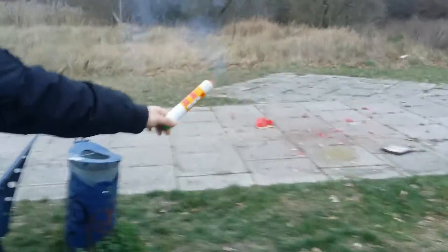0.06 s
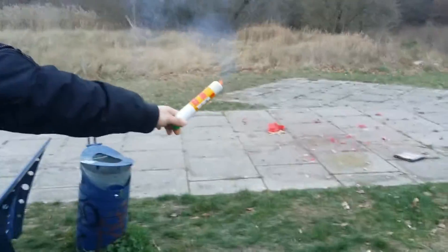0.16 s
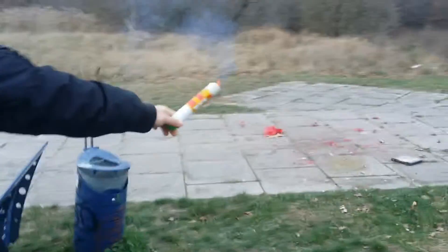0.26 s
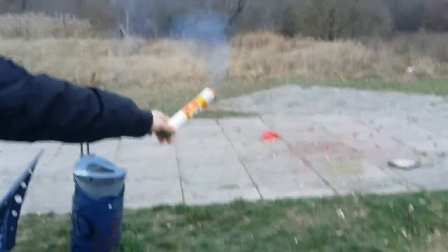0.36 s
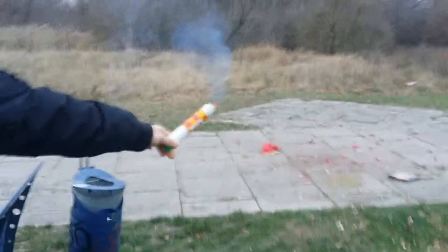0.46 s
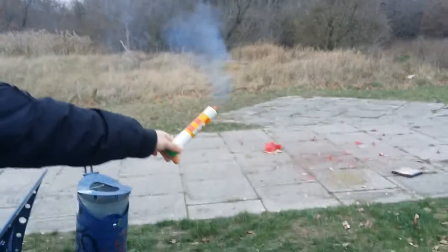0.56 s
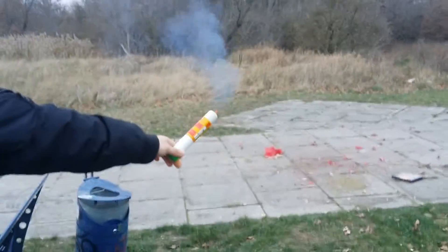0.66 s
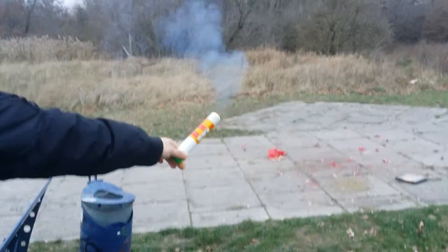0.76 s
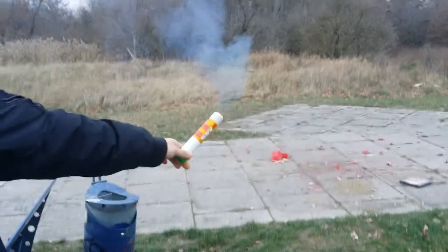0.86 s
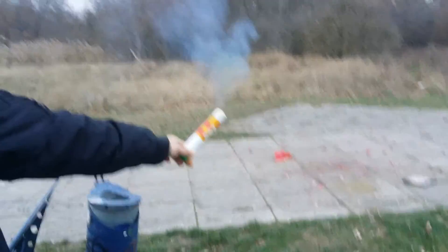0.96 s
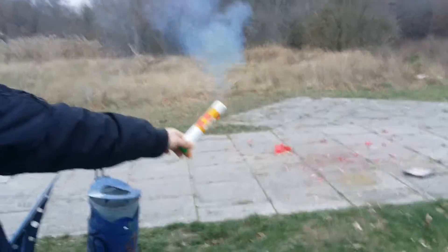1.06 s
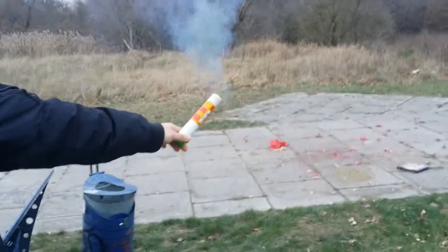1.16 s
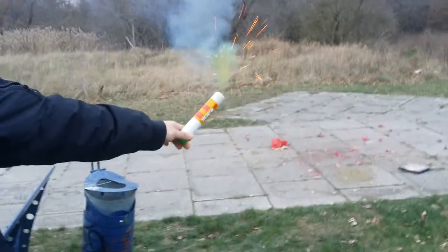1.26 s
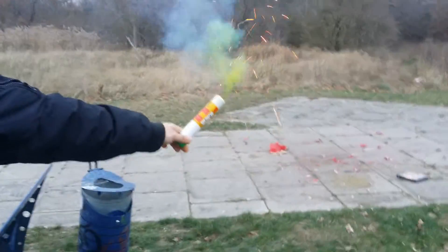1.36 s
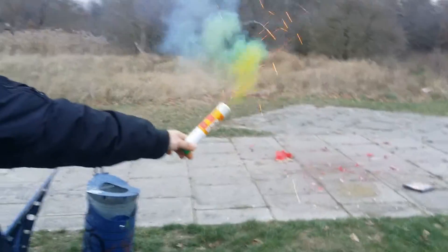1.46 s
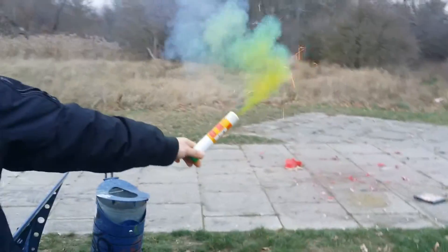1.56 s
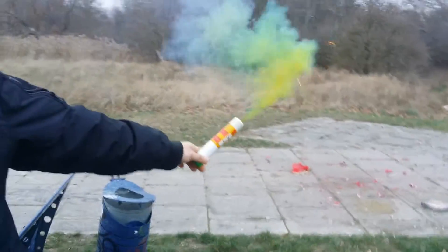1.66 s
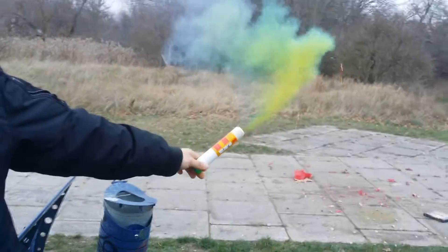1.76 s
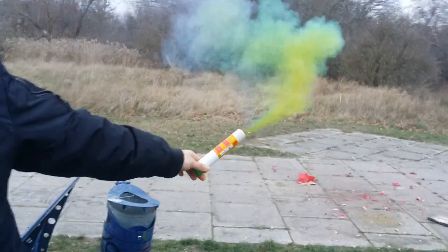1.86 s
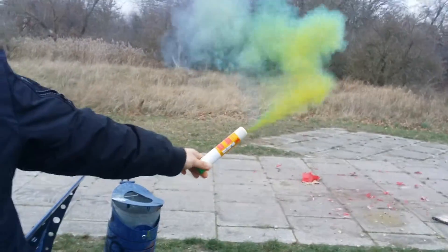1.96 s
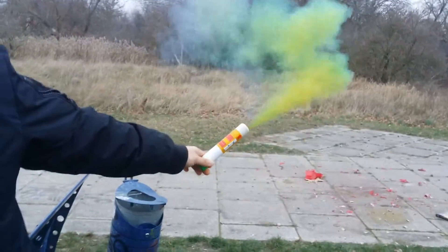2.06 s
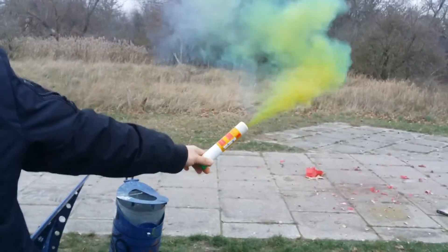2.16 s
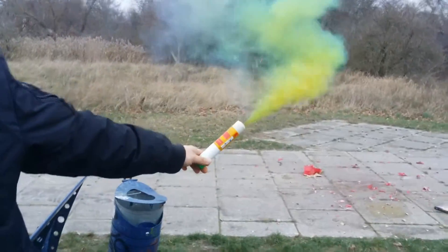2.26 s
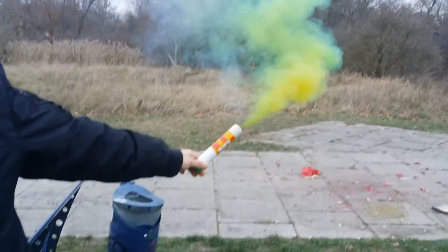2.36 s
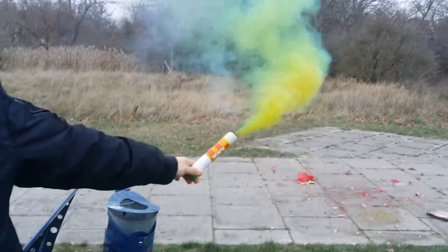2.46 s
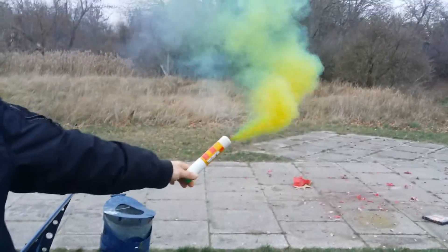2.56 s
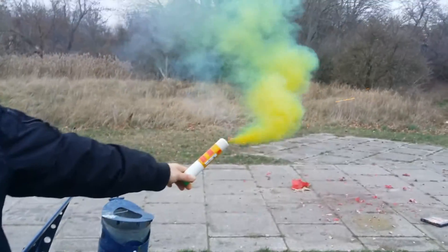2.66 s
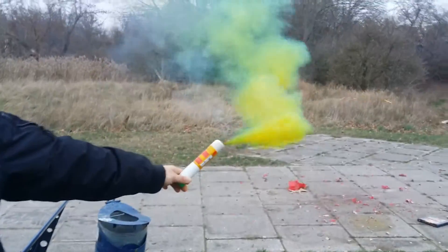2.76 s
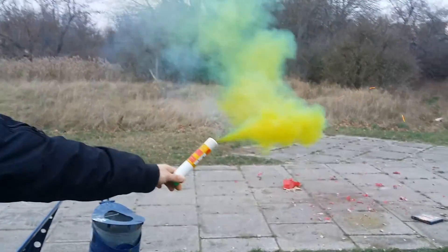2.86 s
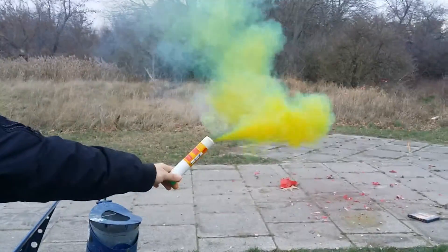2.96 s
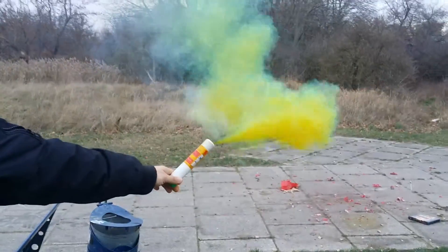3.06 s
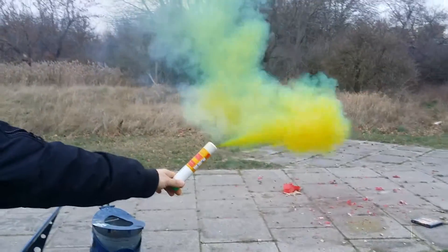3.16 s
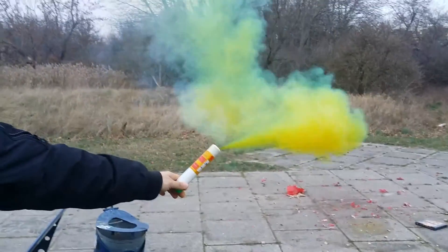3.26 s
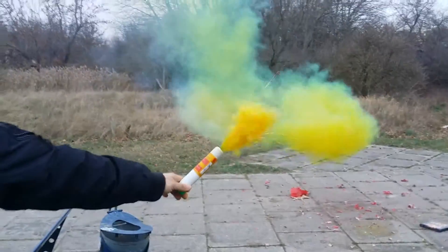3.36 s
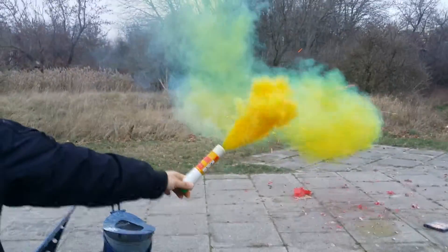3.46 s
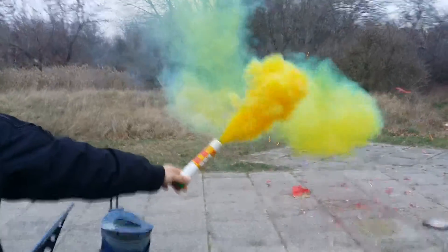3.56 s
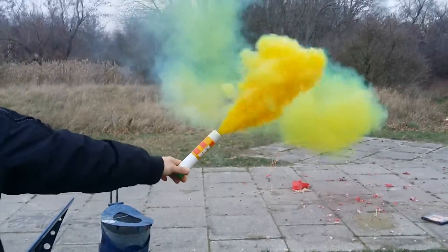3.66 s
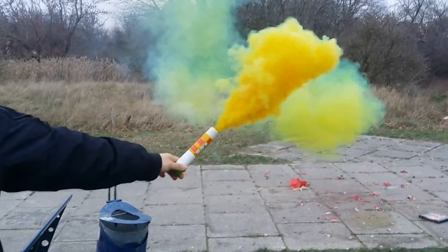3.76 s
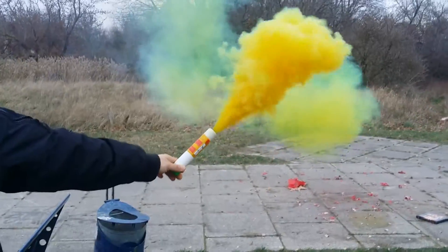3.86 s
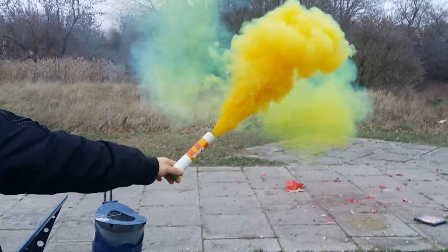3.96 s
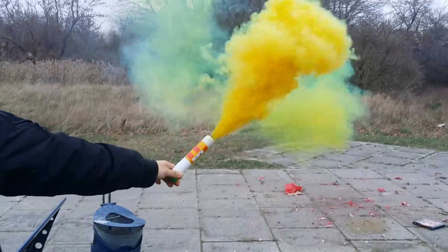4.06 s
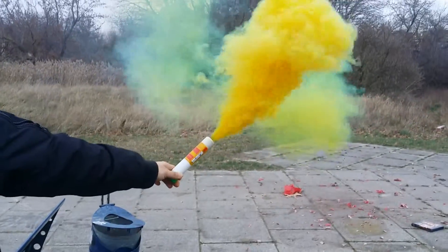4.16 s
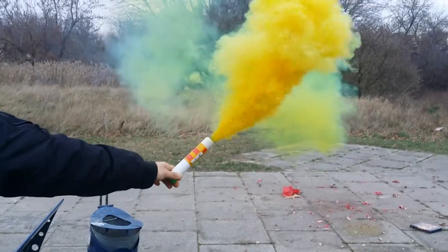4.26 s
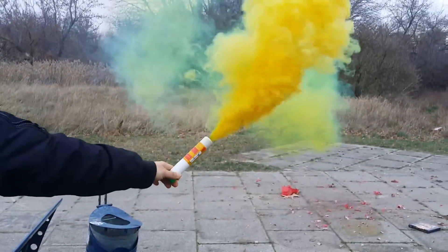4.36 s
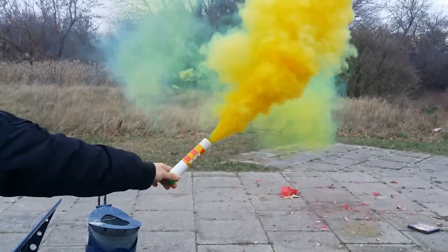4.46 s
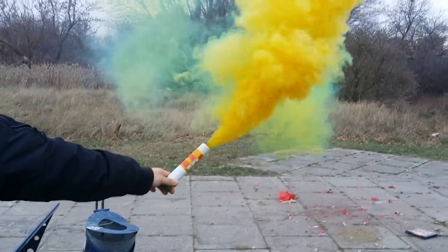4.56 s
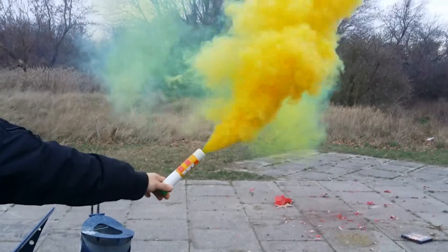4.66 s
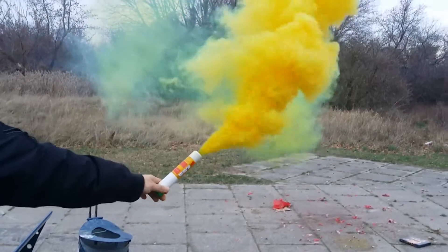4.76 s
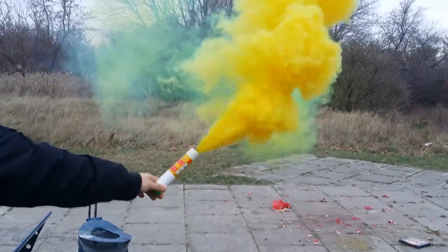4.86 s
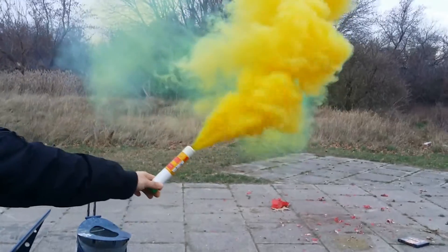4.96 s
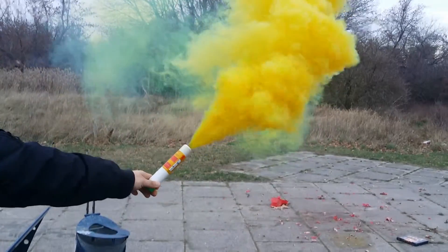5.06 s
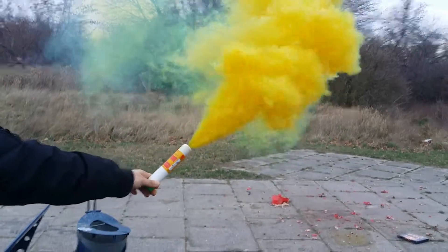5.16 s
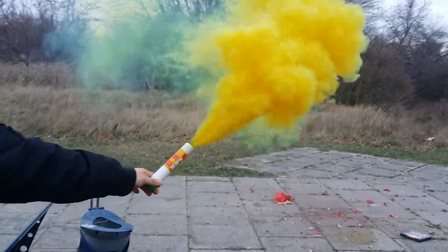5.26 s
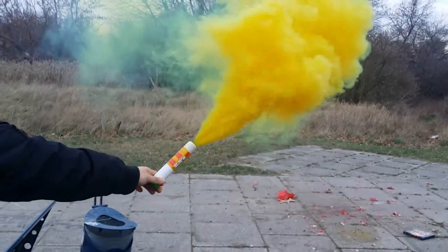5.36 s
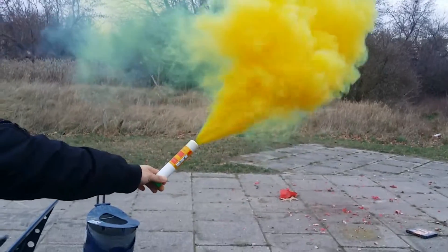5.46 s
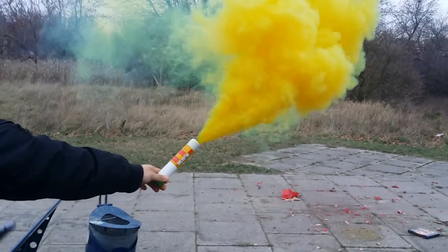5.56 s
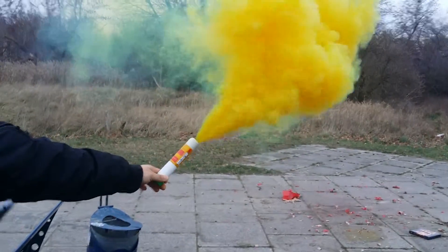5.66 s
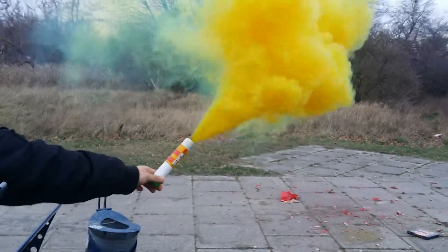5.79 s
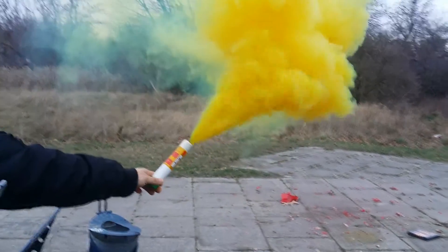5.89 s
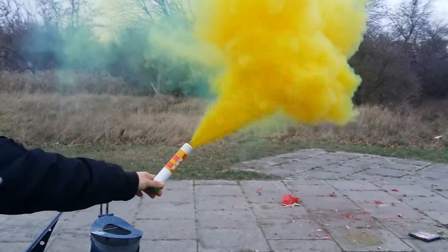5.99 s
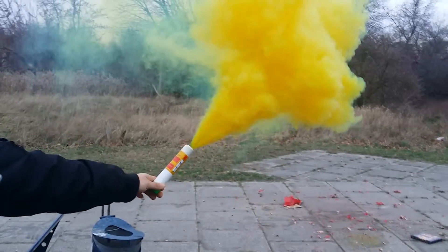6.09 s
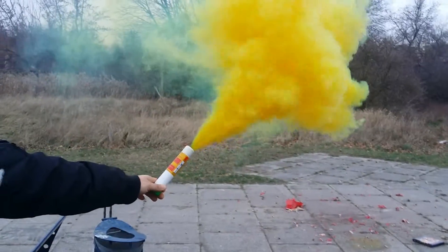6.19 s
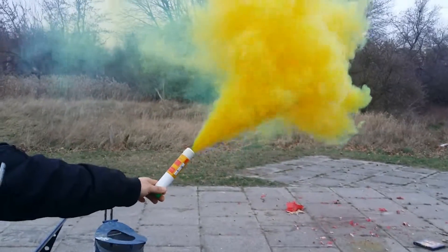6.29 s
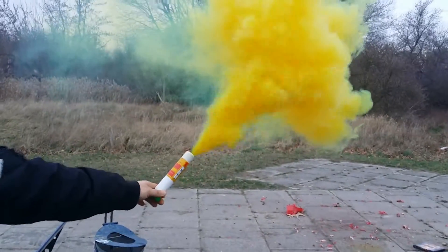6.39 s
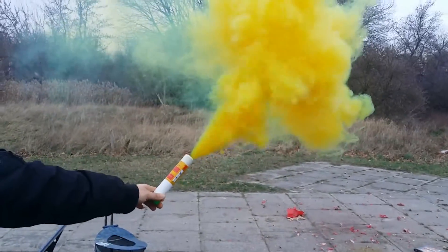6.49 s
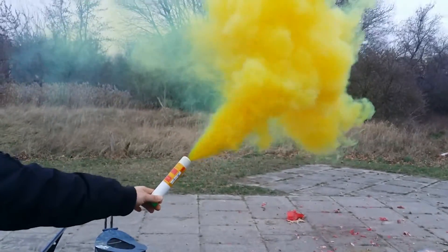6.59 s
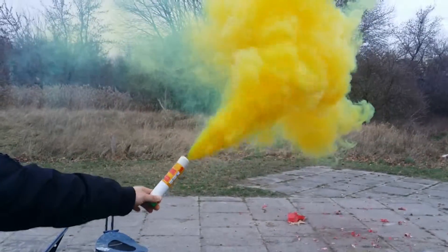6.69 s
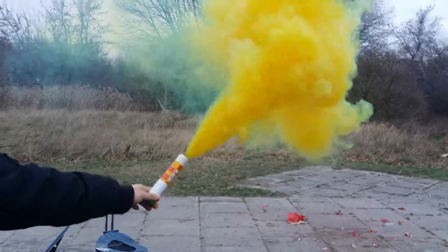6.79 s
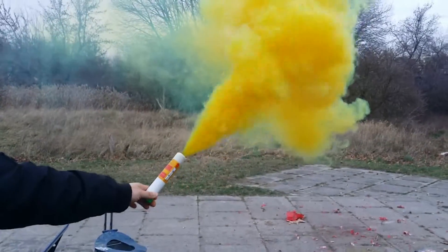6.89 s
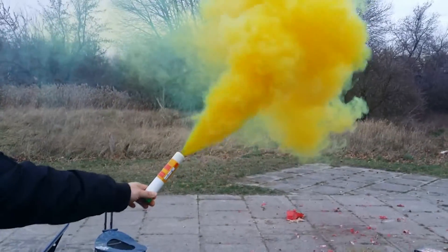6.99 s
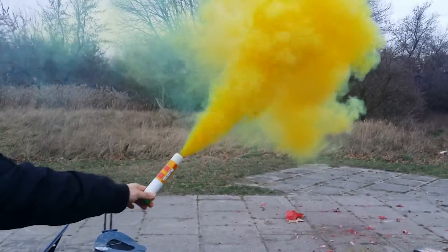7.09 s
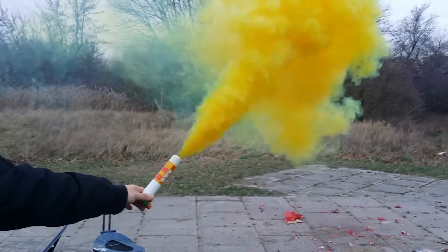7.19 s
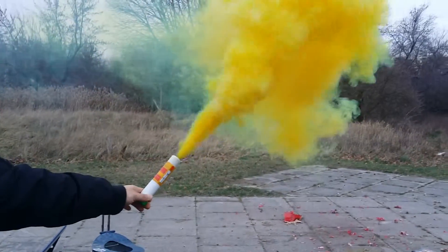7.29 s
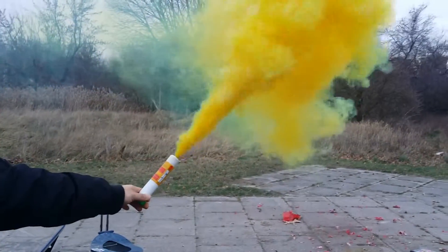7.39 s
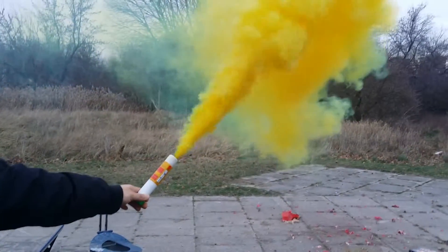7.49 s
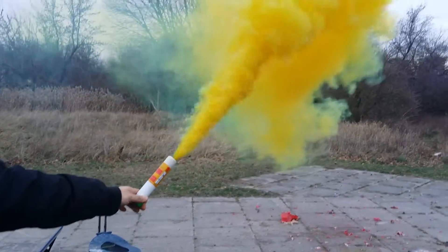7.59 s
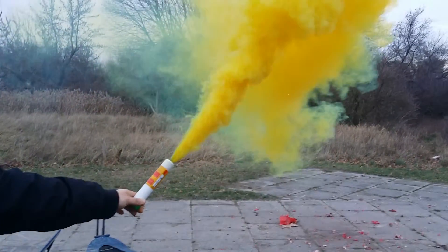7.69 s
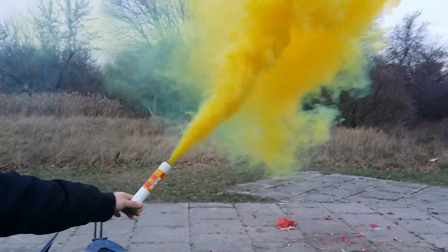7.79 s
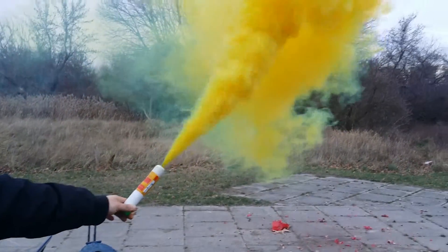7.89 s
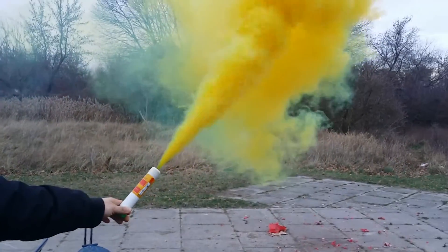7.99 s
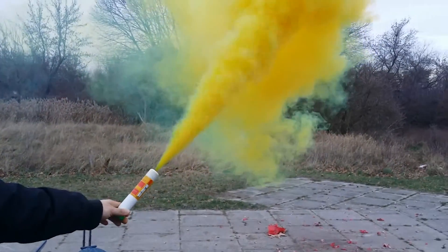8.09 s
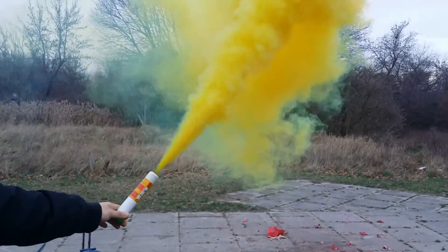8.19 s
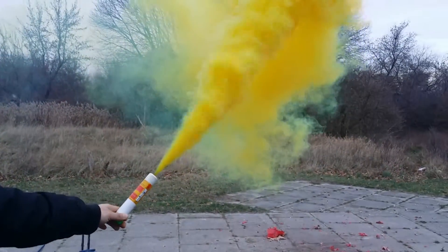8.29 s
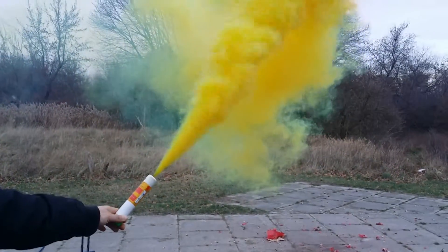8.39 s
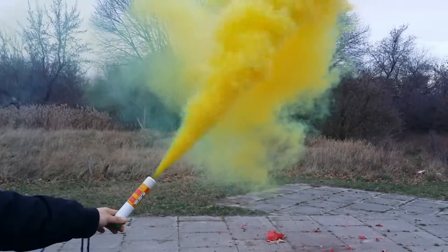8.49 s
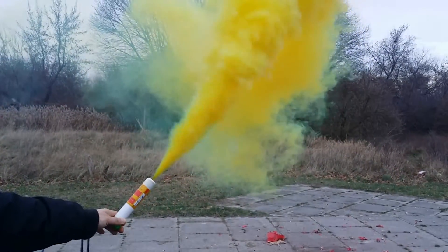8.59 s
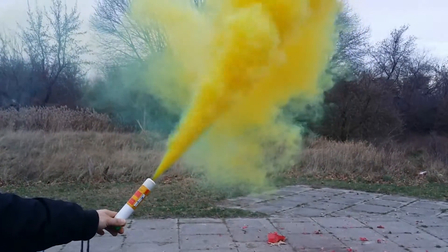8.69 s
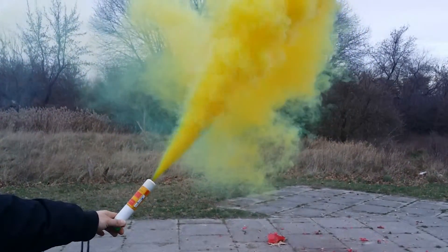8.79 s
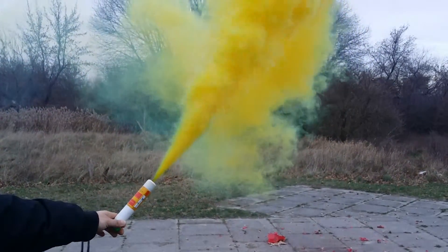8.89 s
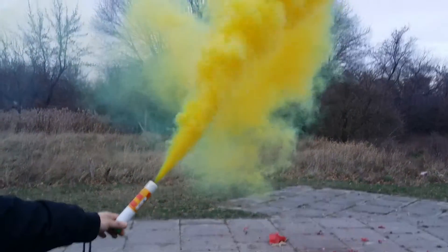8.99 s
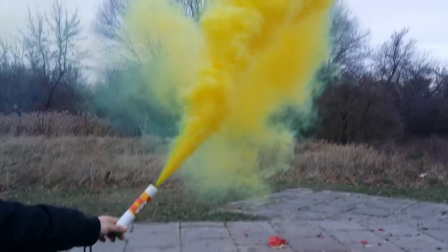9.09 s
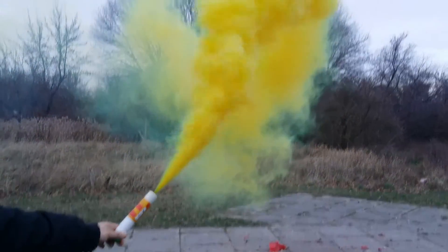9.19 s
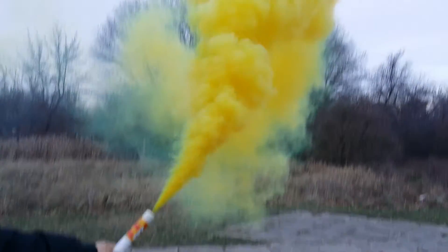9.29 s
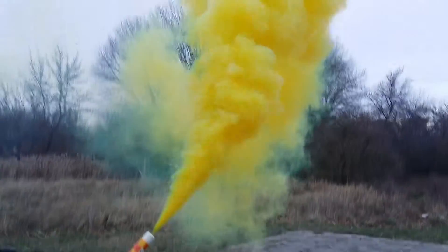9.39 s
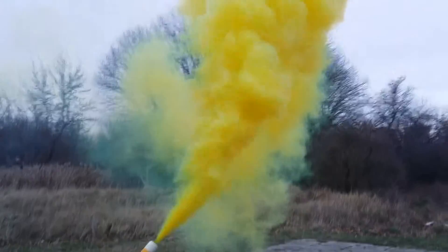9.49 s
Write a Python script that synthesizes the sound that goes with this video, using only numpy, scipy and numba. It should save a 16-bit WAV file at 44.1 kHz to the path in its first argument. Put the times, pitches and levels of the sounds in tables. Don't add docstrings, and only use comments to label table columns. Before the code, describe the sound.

Open air, small handheld stereo microphone about two metres from a burning smoke tube, with a short echo off stone slabs and a constant low rumble of far traffic. At 0.2-0.6 s light hollow knocks and a low shoe or sleeve scuff sound over a very faint hiss, with a small puff near 0.46. The hiss climbs quickly to about 1.6 s, then more gently, turning bright and steady; two soft knocks fall near 2.1-2.3. At 3.3 a pop and rub, then the jet dips and dulls before swelling again from 3.6. Small clicks and knocks come around 5. From 5.9 the loud hiss flutters and chuffs, with sharp spits and hollow tube pops strongest at 6.5-7.3, ending in a low thud and scuff. It stays loud and breathy, with more chuffs from 8.5 and a crisp spit at 9.45. Tone shifts subtly as the microphone moves.

```python
import sys
import numpy as np
from scipy import signal
from scipy.fft import rfft, irfft
from scipy.io import wavfile
from scipy.ndimage import uniform_filter1d, map_coordinates
from numba import njit

SR = 44100
rng = np.random.default_rng(int(sys.argv[2]) if len(sys.argv) > 2 else 0)


def persist_wave(psi):
    counts = np.round(np.clip(psi, -1, 1) * 32767).astype(np.int16)
    wavfile.write(sys.argv[1], SR, np.atleast_2d(counts).T)


def undo_db(level):
    steps = np.asarray(level, float) / 20
    return 10 ** steps


N = 420713
TIME = np.arange(N) / SR


def curves(table):
    s, *columns = np.transpose(table)
    return [np.interp(TIME, s, c) for c in columns]


def bumps(table, scale=1.):
    out = np.zeros(N)
    for s, db, build, drop in table:
        t = (TIME - s) / scale
        out += db * np.exp(-np.where(t < 0, t / build, t / drop) ** 2)
    return out


def walk(rate_hz):
    hold = int(SR / rate_hz)
    steps = np.repeat(rng.standard_normal(N // hold + 1), hold)
    return unit(uniform_filter1d(uniform_filter1d(steps, hold), hold)[:N])


def unit(x):
    return x / np.sqrt(np.mean(x ** 2))


def colour(x, table):
    hz, db = np.transpose(table)
    size = 4096
    log_hz = np.log(np.fft.rfftfreq(size, 1 / SR) + 1)
    cepstrum = irfft(np.log(undo_db(np.interp(log_hz, np.log(hz), db))))
    cepstrum[1:size // 2] *= 2
    cepstrum[size // 2 + 1:] = 0
    return signal.fftconvolve(x, irfft(np.exp(rfft(cepstrum))))[:N]


def dull(x, hz):
    return signal.lfilter(*signal.butter(1, hz, fs=SR), x)


def late(x, ms):
    return map_coordinates(x, [np.arange(N) - ms * SR / 1000], order=3)


@njit
def svf(x, hz, width_hz):
    y, b, l = np.empty(len(x)), 0., 0.
    for i in range(len(x)):
        g, k = np.tan(np.pi * hz[i] / SR), width_hz / hz[i]
        v = (b + g * (x[i] - l)) / (1 + g * (g + k))
        b, l, y[i] = 2 * v - b, l + 2 * g * v, k * v
    return y


def flare():
    # time in seconds, hiss level in dB, jet brightness in dB.
    flow_points = [(0, -66.5, -2), (.3, -57.5, -3), (.56, -52, -5), (.75, -46.5, -4.5), (1.1, -44.5, -1),
                   (1.19, -45, -2.5), (1.35, -39, -1), (1.6, -37.5, 1), (2.3, -35.5, 2.6), (3.31, -32, 3),
                   (3.35, -34.5, 0.5), (3.55, -39, -1.5), (4.3, -33, -0.9), (6.45, -27.5, 2), (7.2, -30, 3),
                   (7.55, -29.5, -0.3), (8.2, -27, 2.1), (9.54, -29.5, 2.5)]
    # crest in seconds, rise over the flow in dB, build in ms, drop in ms.
    chuff_events = [(.459, 6.5, 10, 8.9), (.933, 3, 32, 79), (2.93, -2.5, 23, 21), (3.412, 4.5, 45, 36),
                    (4.245, 1.5, 30, 30), (4.679, 1.5, 25, 18), (4.964, 2, 20, 20), (5.712, 2, 25, 25),
                    (5.941, 2.5, 18, 12), (6.071, 2, 18, 20), (6.38, 2.5, 25, 25), (6.475, 5, 19, 18),
                    (6.615, 5, 50, 44), (6.727, 7.5, 24, 11), (6.9, 6, 50, 33), (7.004, 6.5, 45, 34),
                    (7.225, 9.5, 54, 17), (7.338, 2.5, 18, 14), (7.757, 2.5, 56, 35), (7.842, 3.5, 30, 33),
                    (7.982, 2.5, 40, 38), (8.112, 2, 28, 21), (8.231, 1, 23, 20), (8.501, 5, 40, 33),
                    (8.635, 3.5, 30, 22), (8.755, 2.5, 24, 34), (8.885, 5, 26, 28), (9.069, 5, 32, 28),
                    (9.209, 3, 26, 24), (9.46, 5.5, 13, 32)]
    flow_db, tilt_db = curves(flow_points)
    chuff_db = bumps(chuff_events, scale=1 / 1000) + 0.78 * walk(15)
    return jet(undo_db(flow_db + chuff_db) + spits(), tilt_db) + roar(flow_db, chuff_db)


def spits():
    # start in seconds, peak in dB, length in ms.
    spit_events = [(0.4572, -21, 0.88), (3.3094, -24, 1.6), (5.9394, -12, 2.4), (6.4725, -16, 1.6),
                   (6.7266, -10, 1.8), (7.0034, -4, 1.6), (7.228, -4, 1.7), (8.4994, -19, 1.3),
                   (8.8994, -21, 1.6), (9.061, -17, 1.8), (9.4546, -5, 1.5)]
    out = np.zeros(N)
    for s, db, ms in spit_events:
        t = (TIME - s) * 1000 / ms - 1
        out += undo_db(db - 12) * np.exp(np.where(t < 0, 1.8 * t, -1.5 * t))
    return out


def jet(flow, tilt_db):
    # frequency in Hz, level in dB per Hz.
    jet_spectrum = [(150, -41.5), (600, -33), (1200.0, -23.5), (2200.0, -15.5), (3000.0, -7),
                    (4000.0, -7.5), (5000.0, -6.5), (5800.0, -3), (6500.0, 0.0), (7300.0, -4.5),
                    (8500.0, -7), (10000.0, -10.5), (12000.0, -14), (15500.0, -22.5)]
    patchy_db = .5 * walk(40) + 0.61 * walk(300)
    spark_on = rng.random(N) < 400 / SR
    spark_size = undo_db(3 + 2.7 * np.minimum(rng.exponential(size=N), 4.5))
    sparks = spark_on * rng.standard_normal(N) * spark_size
    gas = unit(rng.standard_normal(N) * undo_db(patchy_db) + sparks)
    hiss = colour(gas * flow, jet_spectrum) / np.std(colour(gas, jet_spectrum))
    low = dull(hiss, 5830.0)
    return undo_db(14) * (low * undo_db(-.8 * tilt_db) + (hiss - low) * undo_db(1.41 * tilt_db))


def roar(flow_db, chuff_db):
    # frequency in Hz, level in dB per Hz.
    roar_spectrum = [(150, -39), (300, -10.5), (500, -10), (800, -7), (1200, -2), (1800, -4), (2600, -3),
                     (4000, -32.5)]
    burn_down_db, burn_down_s = 8.5, 7.7
    level_db = -46.5 + 0.18 * (flow_db + 29) + 0.94 * chuff_db
    level_db = level_db + burn_down_db * np.minimum(TIME / burn_down_s, 1)
    noise = rng.standard_normal(N) * undo_db(walk(12))
    return unit(colour(noise, roar_spectrum)) * undo_db(level_db)


def knocks():
    # start in seconds, peak in dB, main mode in Hz, crack against ring in dB.
    knock_events = [(0.229, -28, 620, -20), (.25, -35, 500, -20), (0.284, -28, 600, -16),
                    (0.327, -33, 520, -26), (0.458, -28, 610, -24), (0.611, -34, 600, -18),
                    (2.118, -32, 373, -22), (2.255, -27.5, 420, -17), (3.313, -27, 1250, -9),
                    (4.866, -30, 740, -12), (4.951, -27, 1120, -10), (5.069, -28, 1110, -14),
                    (5.09, -29, 509, -12), (5.565, -27, 950, -7.5), (5.943, -28, 625, -17),
                    (6.369, -28.5, 686, -15), (6.471, -20, 1110, -21), (6.725, -18.5, 1076, -19),
                    (6.86, -37, 729, -9), (7.003, -22.5, 1090, -10), (7.226, -18, 745, -12),
                    (7.277, -29, 630, -7), (7.3, -18, 308, -17), (7.62, -30, 514, -21),
                    (7.723, -32.5, 540, -7), (9.057, -32, 500, -3), (9.454, -37, 715, -6)]
    out = np.zeros(N)
    t = TIME[:SR // 4]
    for s, db, hz, crack_db in knock_events:
        chance = rng.standard_normal(64)
        t60_s = np.clip(0.039 * undo_db(-.4 * (crack_db + 25.5)), .008, .12)
        fade = np.log(1000) * t / t60_s
        ring = np.exp(-(fade / 1.65) ** 2) * np.sin(2 * np.pi * hz * t)
        ring = ring + .5 * np.exp(-1.2 * fade) * np.sin(2 * np.pi * 1.43 * hz * t)
        ring = np.convolve(ring, np.hanning(64) * (1 + 2.2 * chance))[:len(t)]
        ring = ring / np.abs(ring).max()
        ring[:64] += undo_db(crack_db - 9) * np.hanning(64) * dull(chance, 2200.)
        ring[:30] -= undo_db(crack_db + 14.0) * np.hanning(30)
        i = int(s * SR)
        out[i:i + len(t)] += undo_db(db) * ring[:N - i]
    return out


def scuffs():
    # crest in seconds, level in dB, fade by 10 dB in seconds, centre in Hz.
    scuff_events = [
        (.245, -38, .2, 520),
        (.452, -42, .03, 600),
        (3.318, -37, 0.16, 1400),
        (7.31, -31.5, 0.17, 330),
    ]
    rise_s = 0.013
    grit = unit(rng.standard_normal(N) * undo_db(2.3 * walk(70)))
    out = np.zeros(N)
    for s, db, fade_s, hz in scuff_events:
        t, centre_hz = TIME - s, np.full(N, 1. * hz)
        fall_db = np.where(t < 0, t / rise_s, -t / fade_s) * 10
        fall_db = fall_db - 60 * np.maximum(t / fade_s - 1.3, 0)
        band = svf(svf(grit, centre_hz, .8 * hz), centre_hz, 1.1 * hz)
        out += undo_db(db - 3.0 + fall_db) * unit(band)
    return out


def slab_echo(near):
    # time in seconds, echo delay in ms, level in dB.
    slab_path = [(0, 5.1, -12.5), (4, 5.5, -12), (6.5, 5.6, -11), (9.54, 5.54, -12)]
    echo_ms, echo_db = curves(slab_path)
    return undo_db(echo_db) * late(dull(near, 2330.0) + undo_db(-9) * near, echo_ms)


def bin_glance(near):
    return undo_db(-15) * late(near, 1.6 + 0.052 * walk(1.55))


def clutter(near):
    t60_s = 0.044
    tail = rng.standard_normal(SR // 6) * np.exp(-np.log(1000) * TIME[:SR // 6] / t60_s)
    tail = tail / np.sqrt(np.sum(tail ** 2))
    return late(signal.fftconvolve(near, tail)[:N], 1.505 + 0.201 * walk(2))


def slot(x, hz, keep):
    return x - (1 - keep) * svf(x, hz, 417.0)


def shell(x, pose, port):
    # centre in Hz, width in Hz, remainder as a ratio
    valley_rows = [(3080, 3440, 0.19), (5840, 2200, 0.66), (8190, 6300, 0.2), (10640, 5200, 0.22),
                   (14130, 3600, 0.43), (2523, 4520, 0.18), (5684, 5740, 0.074), (9570, 5100, 0.15),
                   (13050, 5440, 0.14)]
    slide_rows = [(-0.14, 0.11, 0.066), (-0.3, -0.21, 0.043), (0.023, -0.018, -0.075),
                  (-0.18, -0.0048, 0.024), (-0.201, -0.016, 0.14), (-0.036, -0.063, -0.054),
                  (-0.0012, -0.034, -0.032), (0.0078, -0.051, -0.031), (0.04, -0.027, -0.0078)]
    depth_rows = [(0.094, -0.068, -0.18), (-0.27, 0.57, 0.11), (0.18, -0.13, 0.14), (0.5, 0.2, -0.38),
                  (-0.59, 0.93, 0.02), (0.0053, -0.065, 0.0081), (0.034, -0.056, -0.01),
                  (0.063, 0.13, -0.094), (0.25, 0.28, 0.18)]
    own = slice(0, 5) if port == "left" else slice(5, None)
    for (hz, width_hz, keep), slide, depth in zip(valley_rows[own], slide_rows[own], depth_rows[own]):
        centre_hz = np.minimum(hz * 2 ** (np.array(slide) @ pose), .4 * SR)
        remainder = np.minimum(keep + np.array(depth) @ pose, 1)
        x = x - (1 - remainder) * svf(x, centre_hz, 1. * width_hz)
    return x


def camera(near, blows):
    # time in seconds, turn as left lag in ms, tip -1..1, roll -1..1.
    aim_points = [(0.32, -0.028, 1.0, 0.39), (0.57, -0.027, 0.67, 0.74), (0.88, -0.023, 0.68, 1),
                  (1.18, -0.021, 0.23, -0.6), (1.55, -0.011, 0.081, -0.76), (2.15, -0.0063, 0.075, -1.2),
                  (2.9, -0.025, -0.29, -0.75), (3.65, -0.023, -0.67, 0.13), (4.35, -0.026, -0.61, 0.14),
                  (5.0, -0.037, -0.78, 0.41), (5.65, -0.042, -0.79, 0.26), (6.35, -0.043, -0.61, 0.41),
                  (6.98, -0.051, -0.015, 0.14), (7.58, -0.067, 0.33, -0.39), (8.3, -0.072, 0.12, -0.18),
                  (9.1, -0.071, 0.31, -0.2)]
    # time in seconds, both ports Hz, remainder ratio, left port Hz, remainder ratio.
    slot_points = [(0, 2850, .6, 3900, .3), (.5, 2700, .35, 3300, .1), (1.0, 2750, .35, 3400, .15),
                   (1.2, 2150, .3, 1950, .1), (1.6, 2200, .3, 2300, 0.073), (3.2, 2490, .15, 2820, .05),
                   (5, 2580, .2, 3240, 0.045), (6.6, 2560, 0.36, 3300, 0), (9.54, 2620, 0.79, 3360, 0.023)]
    # dB per unit of turn, of tip, of roll.
    left_moves_db = [0.5, -.6, 1.35]
    lag_ms, tip, roll = curves(aim_points)
    ahead_ms, turn_ms = -.04, .04
    pose = np.array([(lag_ms - ahead_ms) / turn_ms, tip, roll])
    both_hz, both_keep, left_hz, left_keep = curves(slot_points)
    left_db = -5 + np.array(left_moves_db) @ pose
    arriving = near + slab_echo(near) + blows + bin_glance(near)
    ports = []
    for port, delay_ms, db in (("left", lag_ms, left_db), ("right", 0 * lag_ms, 0)):
        scatter = clutter(near)
        heard = late(arriving, delay_ms) + undo_db(-17.0) * scatter
        shaded = shell(slot(heard, both_hz, both_keep), pose, port)
        ports.append(undo_db(db) * shaded + undo_db(-11) * dull(scatter, 660.0))
    return np.array([slot(ports[0], left_hz, left_keep), ports[1]])


def town():
    # frequency in Hz, level in dB per Hz.
    town_spectrum = [(15, -38), (30, -16.5), (55, -2.5), (90, 1), (125, 2), (180, -1), (260, -9.5),
                     (500, -14.5), (1200, -20), (2500, -29.5), (6000, -38), (15000, -36)]
    # crest in seconds, swell in dB, approach in seconds, leave in seconds.
    passer_events = [
        (.25, -3.5, 0.18, .12),
        (.6, 1.5, 0.21, 0.23),
        (1.4, 1.5, 0.18, 0.69),
        (3.9, 6, 0.11, .15),
        (4.5, 0.5, .4, .4),
        (5.05, 5, 0.29, 0.3),
        (6.6, 4, 0.62, 0.43),
        (7.36, 4, 0.18, 0.16),
        (8.2, 3.5, 0.68, 0.27),
    ]
    mid = unit(colour(rng.standard_normal(N), town_spectrum))
    side = unit(colour(rng.standard_normal(N), town_spectrum))
    air = side - uniform_filter1d(side, 60)
    side = side * undo_db(-18) + undo_db(-2.5) * air
    swell = undo_db(-48 + bumps(passer_events) + 1.46 * walk(5))
    return swell * np.array([undo_db(-0.5) * (mid + side), undo_db(1.86) * (mid - side)])


def scene():
    return camera(flare() + scuffs(), knocks()) + town()


def low_pass(x):
    return signal.sosfilt(signal.butter(12, 15660, fs=SR, output="sos"), x)


def record(dry):
    top_hz = 15620
    cut = signal.sosfilt(signal.ellip(12, .3, 80, top_hz, fs=SR, output="sos"), dry)
    return low_pass(cut)


dry = scene()
out = record(dry)
persist_wave(out)
```